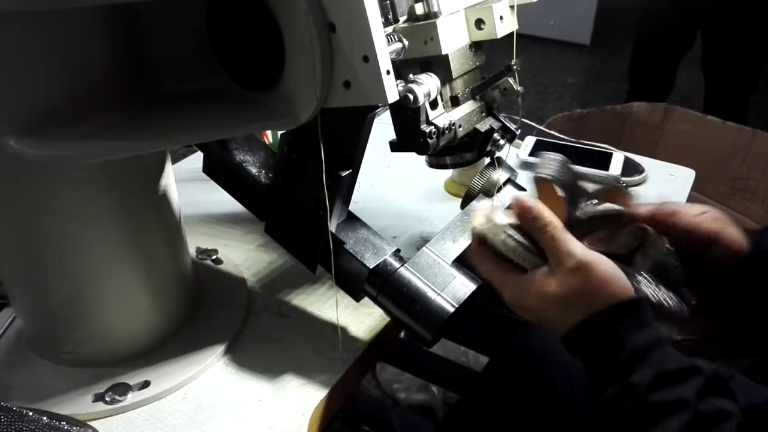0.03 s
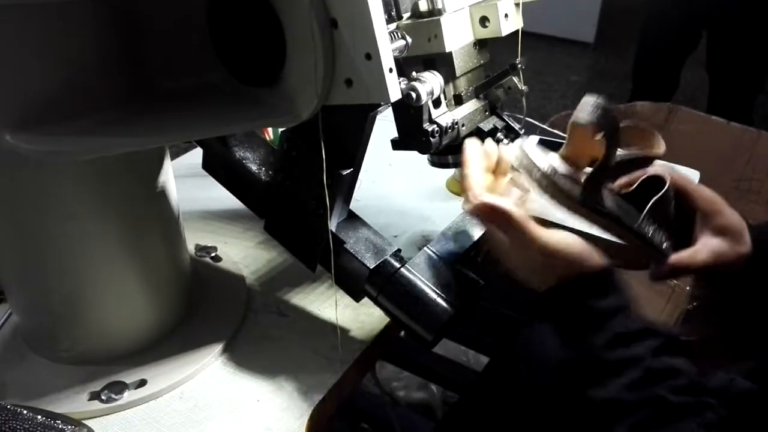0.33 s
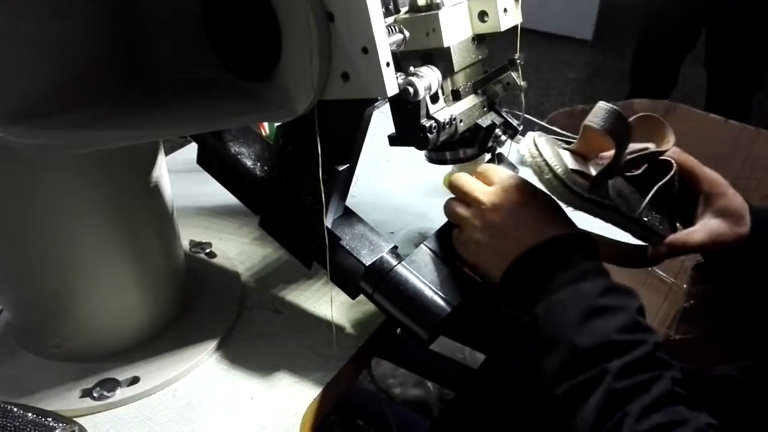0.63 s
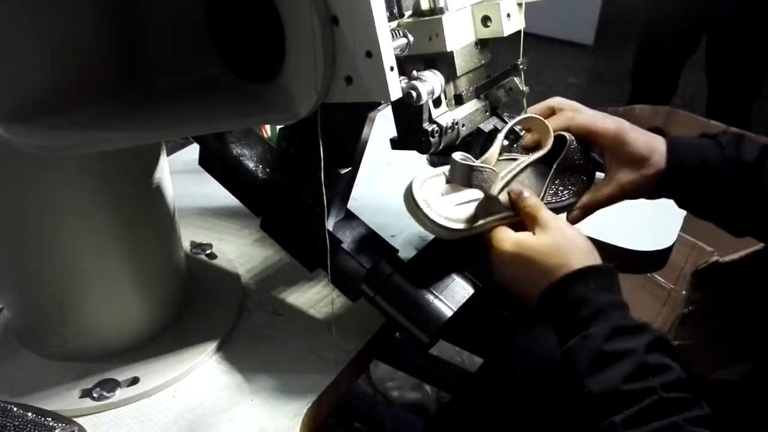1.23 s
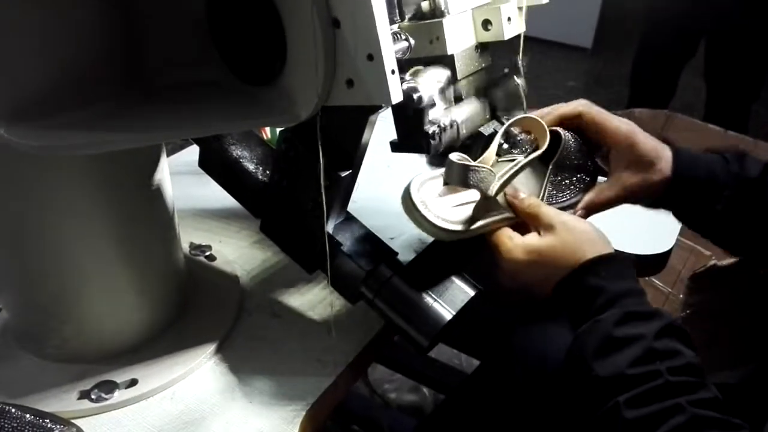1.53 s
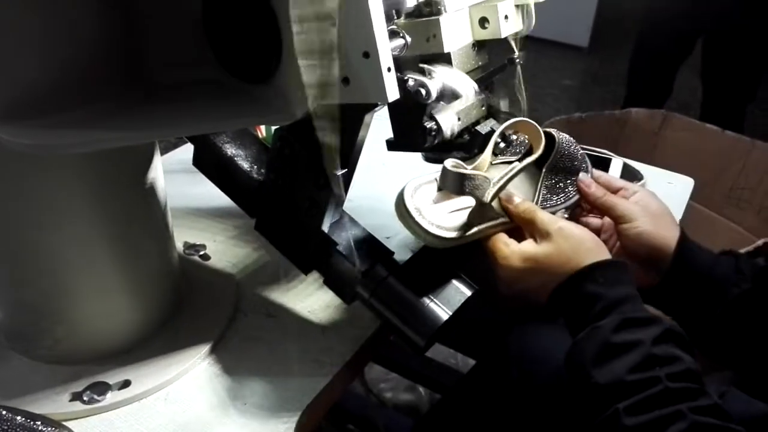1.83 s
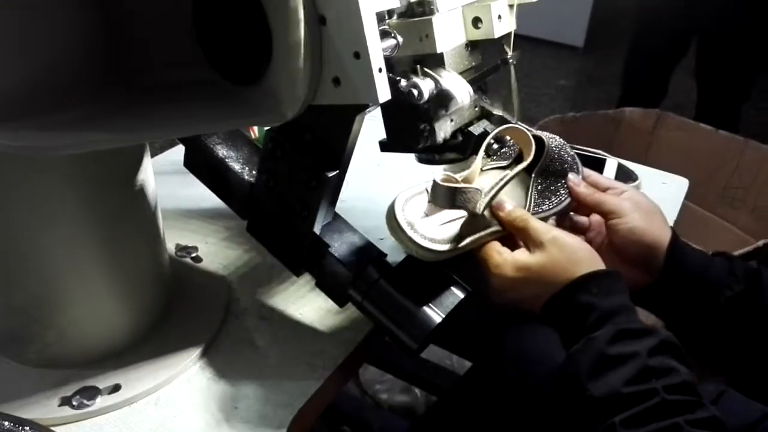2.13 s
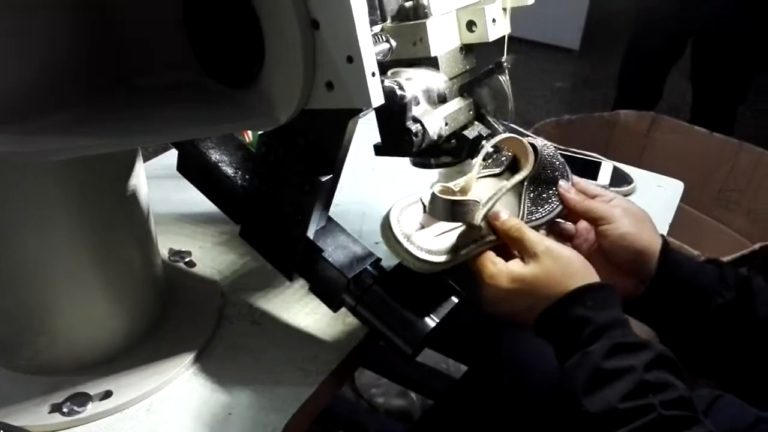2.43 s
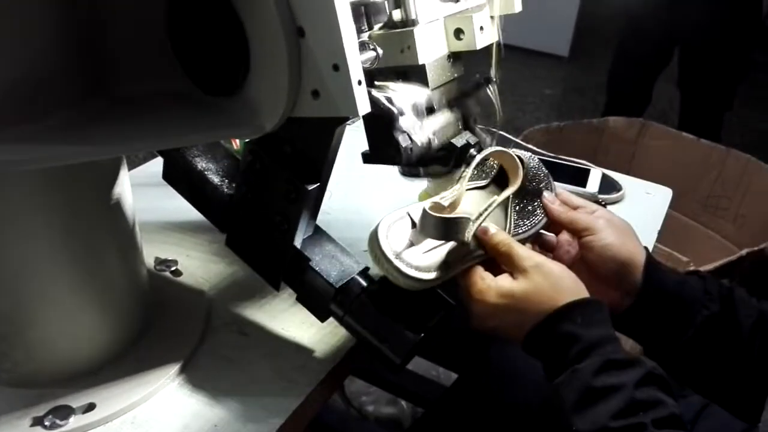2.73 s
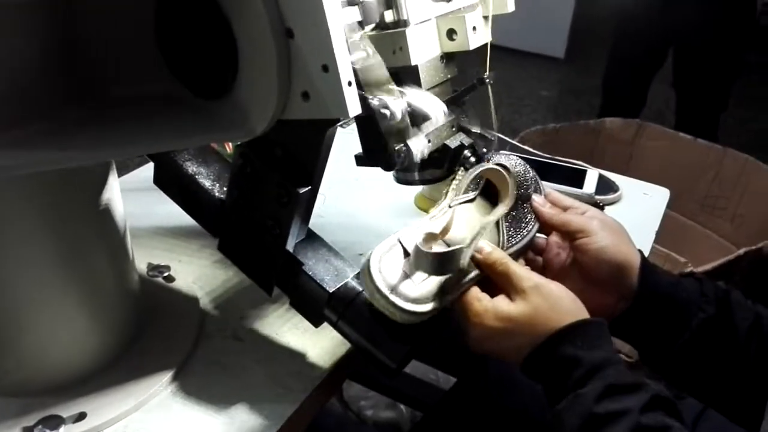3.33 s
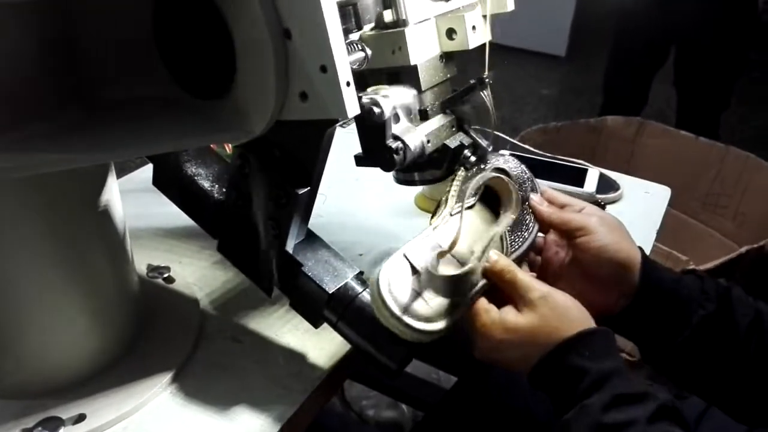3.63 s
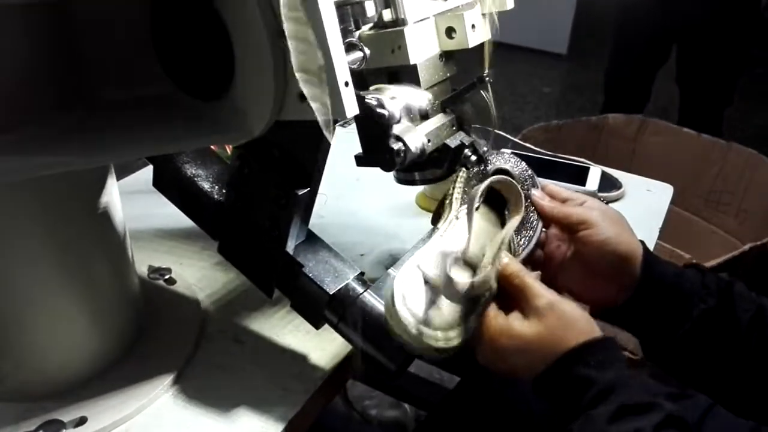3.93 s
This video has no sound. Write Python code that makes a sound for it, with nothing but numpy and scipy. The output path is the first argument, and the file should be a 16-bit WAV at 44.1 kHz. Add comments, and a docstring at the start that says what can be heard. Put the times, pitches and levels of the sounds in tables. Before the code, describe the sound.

In a workshop, an industrial sewing machine hums quietly before its clutch knocks in and it starts stitching a shoe. Rapid metallic clicking and rattling carries on with occasional sharper clacks and a few dull thuds near the end.

```python
"""A heavy shoe-stitching machine idles with a faint motor hum, is clutched in and sews nine stitches a
second. A hiss, a rustle of the shoe, a clutch knock and a latch snap start the seam. Every shaft turn
repeats steel contacts, sliding hiss, linkage rattle and knocks that ring the cast frame and work arm;
every third turn rasps. Stray clacks stand out, and the needle thuds through the thick heel near the end.
The workshop walls add a short tail."""
import sys
import numpy as np
from scipy import signal
from scipy.fft import rfft, irfft
from scipy.io import wavfile
from scipy.ndimage import uniform_filter1d

SR = 44100
rng = np.random.default_rng(int(sys.argv[2]) if len(sys.argv) > 2 else 0)


def master(y):
    """Save y as 16-bit WAV."""
    cut = np.clip(np.atleast_2d(y).T, -1, 1)
    pcm = np.round(cut * 32767)  # scale
    wavfile.write(sys.argv[1], SR, pcm.astype(np.int16))


N = 176400
T = np.arange(N) / SR
START_S, STITCH_S = 1.37, .1097
TURNS_S = np.arange(START_S, T[-1], STITCH_S)
STEEL_GRAIN_DB = -.5

# struck steel spectrum: f/Hz, relative density/dB
STRUCK_STEEL = [(300, -25), (1200, -17), (3000, -6.5), (5000, -9), (7000, -10.5), (8600, 10.5),
                (10000, 9.5), (12300, 9), (14200, 6.5)]
# sliding steel spectrum: f/Hz, relative density/dB
SLIDING_STEEL = [(1500, -21), (4000, -7), (7000, -3.5), (8600, -0.5), (10000, 1.5), (11000, -2.5),
                 (12200, 3), (14200, -7)]


def from_db(db):
    return 10 ** (np.asarray(db) / 20)


def unit_rms(x):
    return x / np.sqrt(np.mean(x ** 2) + 1e-20)


def gain_in_time(curve):
    """Gain per sample from rows of t/s, level/dB."""
    return from_db(np.interp(T, *np.transpose(curve)))


def gain_in_hz(curve):
    """Gain per FFT bin from rows of f/Hz, level/dB."""
    hz, db = np.transpose(curve)
    bins_hz = np.arange(N // 2 + 1) * SR / N
    return from_db(np.interp(np.log(bins_hz + 1e-3), np.log(hz), db))


def white():
    return rng.standard_normal((2, N))


def highpass(x, hz, order=2):
    return signal.sosfilt(signal.butter(order, hz, "high", fs=SR, output="sos"), x)


def stereo(noises, spectrum, width, lean):
    """Two noises as mid and side of a shaped stereo pair, rms 1."""
    mid, side = rfft(noises)
    side = side * gain_in_hz(width)
    left = np.sqrt(gain_in_hz(lean))
    pair = np.array([(mid + side) * left, (mid - side) / left]) / np.sqrt(left ** 2 + left ** -2)
    return unit_rms(irfft(pair * gain_in_hz(spectrum), N))


def coloured(noises, spectrum):
    """Shaped noise with the machine's stereo image, rms 1."""
    # stereo width: f/Hz, side minus mid/dB
    width = [(60, -69), (150, -23), (380, -11.5), (950, -3.5), (2380, 0), (5970, -1), (15000, 0.5)]
    # balance: f/Hz, left minus right/dB
    lean = [(60, 0.0), (99, 1.5), (160, -1), (270, 5), (450, -1), (740, -2.5), (1220, 1), (2010, -1),
            (3320, -1), (5490, -0.5), (9070, -4), (15000, 3)]
    return stereo(noises, spectrum, width, lean)


def resonate(x, hz, width_hz):
    """Two-pole resonance, peak gain 1."""
    r, w = np.exp(-np.pi * width_hz / SR), 2 * np.pi * hz / SR
    return signal.lfilter(np.array([1, 0, -1]) * (1 - r * r) / 2, [1, -2 * r * np.cos(w), r * r], x)


def ring(pushes, hz, t60_s):
    """Damped mode: a unit push starts a sine of height 1."""
    r, w = from_db(-60 / (t60_s * SR)), 2 * np.pi * hz / SR
    return signal.lfilter([0, np.sin(w)], [1, -2 * r * np.cos(w), r * r], pushes[:N] + 1e-18)


def grain(depth_db):
    """Uneven strength of tiny impacts, each under 1 ms."""
    flicker = unit_rms(uniform_filter1d(rng.standard_normal(N), size=28))
    return unit_rms(from_db(depth_db * np.clip(flicker, -2, 2)))


def blow(at_s, attack_s, decay_s):
    """Contact envelope: quick rise, sharp bounces, exponential fall."""
    hold_s, bounce_decay_s = .003, .0007
    out, first = np.zeros(N), max(int(at_s * SR), 0)
    age = np.maximum(T[first:first + SR // 12] - at_s, 0)
    gap_s = .0012 * np.exp(.2 * rng.standard_normal())
    bounces = np.exp((gap_s / 2 - age % gap_s) / bounce_decay_s)
    bounces /= np.sqrt(np.sinh(gap_s / bounce_decay_s) * bounce_decay_s / gap_s)  # rms 1
    rise = np.clip(age / attack_s, 0, 1)
    fall = np.exp(-np.maximum(age - hold_s, 0) / decay_s)
    out[first:first + len(age)] = bounces * rise * fall
    return out


def ringing(chatter, hz, ring_db):
    """Steel chatter plus the broad ring of one small part, rms 1."""
    return unit_rms(chatter + from_db(ring_db) * unit_rms(resonate(chatter, hz, width_hz=880)))


def turning(repeat_share):
    """Vibration of which a share of the power repeats every shaft turn."""
    fresh = white()
    one_turn = irfft(np.exp(2j * np.pi * rng.random((2, round(STITCH_S * SR) // 2 + 1))))
    repeating = unit_rms(one_turn[:, np.arange(N) % one_turn.shape[1]])
    return np.sqrt(repeat_share) * repeating + np.sqrt(1 - repeat_share) * fresh


def every_turn(hits):
    """Times and levels of one turn's hits, repeated along the seam."""
    return np.transpose([(turn_s + offset_s, db) for turn_s in TURNS_S for offset_s, db in hits])


def waver(cutoff_hz=7):
    """Slow random drift, rms 1."""
    lowpass = signal.butter(2, cutoff_hz, fs=SR, output="sos")
    return unit_rms(signal.sosfilt(lowpass, rng.standard_normal(N + SR))[SR:])


def motor_hum():
    """Motor tones, wavering in level and phase."""
    # hum partials: f/Hz, rms before trim/dB
    partials = [(102, -75.5), (183, -68), (371, -68.5), (555, -76.5), (628, -76.5), (1184, -77.5)]
    out, depth, trim_db = 0, .18, -1.5
    for hz, db in partials:
        height = np.sqrt(2) * from_db(db + trim_db) * (1 + depth * waver())
        out += height * np.sin(2 * np.pi * (hz * T + rng.random()) + depth * waver())
    return out


def idle():
    """Steady workshop hiss, motor hum and a thin whirr."""
    # hiss spectrum: f/Hz, relative density/dB
    spectrum = [(25, -6), (50, -14), (75, -10.5), (102, -5.5), (129, -14.5), (175, -8), (215, -12.5),
                (335, -12), (430, -16), (620, -13.5), (780, -19.5), (1160, -18.5), (1500, -24.5),
                (2000, -27), (2350, -27.5), (2550, -21), (2850, -17.5), (3060, -30), (4000, -29),
                (5000, -26.5), (6300, -25), (8000, -17.5), (12000, -15.5), (14000, -15.5)]
    # stereo width: f/Hz, side minus mid/dB
    width = [(60, -23), (240, -12), (950, -0.5), (3770, 1.5), (15000, -1)]
    # balance: f/Hz, left minus right/dB
    lean = [(60, -2.5), (180, -1.5), (550, 0.5), (1650, -1.0), (4970, -3), (15000, -3)]
    whirr_hz = 2730
    whirr = unit_rms(resonate(resonate(white(), whirr_hz, width_hz=220), whirr_hz, width_hz=440))
    hiss = stereo(white(), spectrum, width, lean)
    return from_db(-51) * hiss + motor_hum() + from_db(-72) * whirr


def take_up():
    """Slipping hiss as the shoe is set and the drive takes up."""
    # hiss envelope: t/s, level/dB
    envelope = [(1.0, -80), (1.06, -58.5), (1.2, -57.5), (1.29, -58), (1.32, -38.5), (1.37, -38),
                (1.395, -79), (1.43, -49), (1.5, -96)]
    return gain_in_time(envelope) * coloured(white(), SLIDING_STEEL)


def rustle(at_s=1.155, width_s=.015):
    """The shoe brushes the guide before the seam begins."""
    # rustle spectrum: f/Hz, relative density/dB
    spectrum = [(800, 4), (2500, 5), (5000, -5), (8000, -15), (14000, -21)]
    swell = np.exp(-.5 * ((T - at_s) / width_s) ** 2)
    return from_db(-60) * swell * coloured(white(), spectrum)


def clutch_thud(at_s=1.324, rise_s=.008, fall_s=.017):
    """Dull thud as the drive engages."""
    # thud spectrum: f/Hz, relative density/dB
    spectrum = [(40, -17), (100, -0.5), (250, -10), (500, -2), (900, -6), (2200, -10), (4000, -20),
                (14000, -52)]
    envelope = np.exp(-np.maximum((at_s - T) / rise_s, (T - at_s) / fall_s))
    return from_db(-41) * envelope * coloured(white(), spectrum)


def clutch_knock():
    """The clutch plates meet in one compact knock."""
    # knock spectrum: f/Hz, relative density/dB
    spectrum = [(100, -12), (350, -11), (520, -2), (650, -9), (820, 5), (980, -4), (1150, 9), (1500, -13),
                (2200, -3), (4000, -25), (14000, -45)]
    return from_db(-38) * blow(at_s=1.322, attack_s=.0032, decay_s=.004) * coloured(white(), spectrum)


def latch():
    """The starting latch snaps, bounces twice and rings brightly."""
    # snap and bounces: t/s, level/dB
    hits = [(1.355, -20), (1.3564, -26), (1.3577, -31)]
    # latch modes: f/Hz, relative level/dB, t60/s
    modes = [(4800, -11.5, 0.019), (5970, -18, 0.028), (6900, -3.5, 0.008), (7550, -3, 0.014),
             (8270, 2, 0.012), (9460, -1, 0.008), (11300, -8, .006), (13600, -6, 0.0056)]
    age, out = T[:SR // 20], np.zeros((2, N))
    for at_s, db in hits:
        first = int(at_s * SR)
        for hz, mode_db, t60_s in modes:
            envelope = from_db(db + mode_db - 60 * age / t60_s)
            phase = 2 * np.pi * (hz * age + rng.random((2, 1)) / 2)
            out[:, first:first + len(age)] += envelope * np.sin(phase)
    return highpass(out, hz=3800, order=4)  # so small a part radiates little bass


def mechanism():
    """Linkage rattle, sliding steel and frame rumble swell with each turn; every third turn rasps."""
    # one cycle: phase/turns, sliding/dB, linkage/dB, frame/dB
    cycle = [(0, -28, -30, -37), (.085, -38, -28.5, -34), (.16, -29, -29, -39), (.25, -26, -29.5, -36.5),
             (.34, -30, -29.5, -32), (.4, -22, -25, -38), (.48, -23.5, -25, -40.5), (.56, -25, -27.5, -33),
             (.65, -27.5, -27, -34.5), (.75, -26, -31, -39.5), (.87, -33, -30, -36.5)]
    # linkage spectrum: f/Hz, relative density/dB
    linkage_spectrum = [(130, -25), (300, -28), (560, 2.5), (900, -2.5), (1060, -3), (1210, -4),
                        (1400, -3.5), (2000, -2.5), (2850, -5), (3200, -6), (4200, -7.5), (5200, -7),
                        (7500, -9.5), (14000, -6)]
    # linkage resonances: f/Hz, width/Hz, gain/dB
    linkage_modes = [(845, 40, 1), (920, 35, -1), (1055, 45, -2), (1317, 14, 8), (1680, 70, -3),
                     (2730, 74, -7), (3070, 160, -6), (4860, 110, -6)]
    # frame spectrum: f/Hz, relative density/dB
    frame_spectrum = [(25, -8), (70, -17), (93, -3), (116, -44), (143, -10), (172, -15), (222, -8),
                      (270, -5.5), (335, -9), (400, -8), (472, 8.5), (570, -12.5), (655, -10), (740, -23),
                      (900, -8), (1500, -37)]
    rasp_at_s, rasp_width_s = .025, .018
    phase, *levels_db = np.transpose(cycle)
    turns = (T - START_S) / STITCH_S
    slide, link, frame = [from_db(np.interp(turns, phase, db, period=1)) for db in levels_db]
    from_rasp_s = (T - START_S) % (3 * STITCH_S) - rasp_at_s
    rasp = np.exp(-.5 * (from_rasp_s / rasp_width_s) ** 2)
    rough = grain(depth_db=2.1)
    rattle = coloured(turning(repeat_share=.062), linkage_spectrum)
    rattle *= np.hypot(link, from_db(-28.5) * rasp) * rough
    rattle += sum(from_db(db) * resonate(rattle, hz, width_hz) for hz, width_hz, db in linkage_modes)
    sliding = coloured(white(), SLIDING_STEEL) * np.hypot(slide, from_db(-23.5) * rasp) * rough
    rumble = frame * coloured(turning(repeat_share=.44), frame_spectrum)
    return rattle + sliding + rumble


def contacts(spread_db=.3, jitter_s=.0003):
    """Needle bar, hook and feed strike at their places in every turn."""
    # steel contacts: t in turn/s, level/dB, attack/s, decay/s, ring f/Hz, ring level/dB
    hits = [(.0066, -17.5, .0006, .0016, 8240, -10), (0.023, -30.5, 0.0013, 0.00078, 9300, 3),
            (0.039, -19.5, 0.0011, 0.0068, 9640, 2), (.046, -16.5, 0.00046, 0.0053, 13300, -6),
            (.0586, -20.5, .0008, .0025, 12000, 12), (.077, -24.5, 0.0015, .0017, 10100, 6)]
    # contact force, rising as the needle meets the sole: t/s, gain/dB
    force = [(1.45, -9), (1.65, -2.5), (2.15, -3), (2.3, -3.5), (3.5, -5.5), (3.75, -5), (4.0, 0.5)]
    out = 0
    for offset_s, db, attack_s, decay_s, hz, ring_db in hits:
        envelope = 0
        for at_s in TURNS_S + offset_s:
            harder, late = rng.standard_normal(2)
            envelope += from_db(db + spread_db * harder) * blow(at_s + jitter_s * late, attack_s, decay_s)
        out += envelope * ringing(coloured(white(), STRUCK_STEEL), hz, ring_db)
    return gain_in_time(force) * out * grain(STEEL_GRAIN_DB)


def arm_thumps(spread_db=2.5, jitter_s=.00031):
    """Needle bar and feed knock the hollow work arm, heavier under load."""
    # thumps: t in turn/s, level/dB
    hits = [(.007, -28.5), (.032, -33.5), (0.0556, -30), (.064, -36.5), (0.0732, -32)]
    # arm load: t/s, gain/dB
    load = [(1.43, 0), (1.53, 5.5), (1.62, 2.5), (2.25, -5), (2.85, -1), (3.6, 1), (3.78, -1.5),
            (3.88, 1.5), (4.0, 4)]
    at_s, db = every_turn(hits)
    late, harder = rng.standard_normal((len(at_s), 2)).T
    pushes = np.zeros(N + SR)
    pushes[((at_s + jitter_s * late) * SR).astype(int)] = from_db(db + spread_db * harder)
    return gain_in_time(load) * ring(pushes, hz=471.5, t60_s=.06)


def frame_knocks(spread_db=5, jitter_s=.00031):
    """Cam knocks ring the cast frame, each with its own mix of modes."""
    # cam knocks: t in turn/s, level/dB
    hits = [(.009, -26), (.036, -26.5), (.057, -25.5), (.067, -26)]
    # frame modes: f/Hz, relative level/dB, t60/s
    modes = [(95, -31.5, 0.3), (144.2, -20.5, 0.43), (217.8, -20.5, 0.17), (272.3, -12, 0.21),
             (401.2, -12.5, 0.26), (492, -16.5, 0.067), (602, -6.5, 0.043), (657, -6.5, 0.18)]
    at_s, db = every_turn(hits)
    onsets = ((at_s + jitter_s * rng.standard_normal(len(at_s))) * SR).astype(int)
    out = 0
    for k, (hz, mode_db, t60_s) in enumerate(modes):
        harder = np.clip(rng.standard_normal(len(at_s)), -1.5, 1.5)
        pushes = np.zeros(N + SR)
        pushes[onsets] = from_db(db + mode_db + spread_db * harder)
        out += (-1) ** k * ring(pushes, hz, t60_s) / 2
    return out


def clacks(attack_s=.0002):
    """Now and then a steel part strikes harder."""
    # single clacks: t/s, level/dB, decay/s, ring f/Hz, ring level/dB
    hits = [(1.4878, -14, .0008, 2900, -7), (1.6148, -25, .002, 11600, 0), (1.6300, -21.5, .003, 11200, -3),
            (1.9585, -23, .004, 10900, 1), (2.1845, -20.5, .0018, 11800, -4),
            (2.2722, -22.5, .002, 9400, -1), (2.2883, -22, .005, 10000, -6),
            (2.5098, -17, .0025, 11800, -6), (2.5824, -21.5, .0015, 9400, 0),
            (2.6176, -18.5, .004, 11900, -6), (2.8036, -21.5, .002, 9100, -4),
            (2.9118, -22, .002, 8500, -2), (2.9482, -16, .003, 12300, 10), (3.1322, -20.5, .0015, 8850, -3),
            (3.2411, -25, .0015, 8700, 0), (3.2758, -20, .0032, 9500, 5), (3.3517, -23.5, .002, 9600, 2),
            (3.4614, -23.5, .0015, 9900, -6), (3.4752, -17, .0016, 10000, -14),
            (3.5705, -25.5, .0015, 8750, 0), (3.6056, -17, .0015, 12000, -3), (3.6811, -24, .002, 9550, -3),
            (3.6880, -17, .003, 9900, -12), (3.9330, -19.5, .0044, 11000, 0)]
    chatter = coloured(white(), STRUCK_STEEL) * grain(STEEL_GRAIN_DB)
    return sum(from_db(db) * blow(at_s, attack_s, decay_s) * ringing(chatter, hz, ring_db)
               for at_s, db, decay_s, hz, ring_db in hits)


def heel_thuds():
    """Dull, heavy blows of the needle going through the heel."""
    # blows: t/s, level/dB
    hits = [(3.712, -27), (3.735, -33), (3.848, -29), (3.900, -30), (3.927, -25)]
    # thud spectrum: f/Hz, relative density/dB
    spectrum = [(90, -20), (270, -9), (400, 3), (480, 11), (600, -11), (850, -9), (1300, -12), (2500, -37),
                (6000, -48)]
    envelope = sum(from_db(db) * blow(at_s, attack_s=.0032, decay_s=.009) for at_s, db in hits)
    return envelope * coloured(white(), spectrum)


def workshop(x, t60_s=.3, delay_s=.005):
    """Short diffuse tail from the walls, without deep bass."""
    age = T[:SR // 2]
    tail = white()[:, :len(age)] * from_db(-60 * age / t60_s) * (age > delay_s)
    tail = highpass(tail, hz=242)
    tail /= np.sqrt(np.sum(tail ** 2) / 2)
    return from_db(-14) * signal.fftconvolve(x, tail, axes=1)[:, :N]


def scene():
    """The running machine in its room, over the idle hum."""
    # how hard the machine works: t/s, gain/dB
    effort = [(1.29, -76), (1.375, -23), (1.402, -14), (1.416, -8), (1.445, -1), (1.55, -3), (1.9, -3),
              (2.25, -3.5), (2.4, -0.5), (2.55, -1), (2.72, -1), (3.0, -1.5), (3.3, -2), (3.58, -1),
              (3.72, 1.5), (3.85, 0.5), (4.0, -1)]
    running = contacts() + mechanism() + frame_knocks() + arm_thumps()
    sewing = gain_in_time(effort) * running + clacks() + heel_thuds()
    starting = latch() + clutch_thud() + take_up() + clutch_knock() + rustle()
    machine = highpass(starting + sewing, hz=102)
    return machine + workshop(machine) + idle()


def record(dry):
    """Steep treble cut."""
    cutoff_hz = 14280
    return signal.sosfilt(signal.ellip(12, .2, 80, cutoff_hz, fs=SR, output="sos"), dry)


dry = scene()
out = record(dry)
master(out)
```